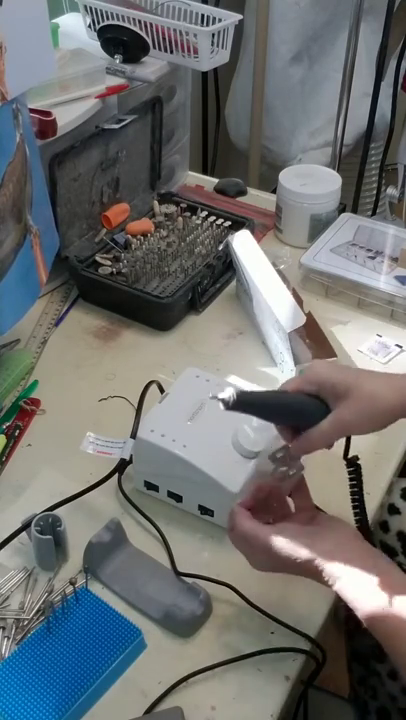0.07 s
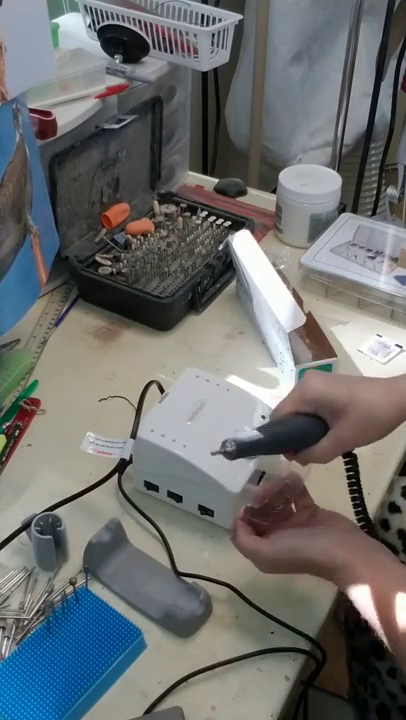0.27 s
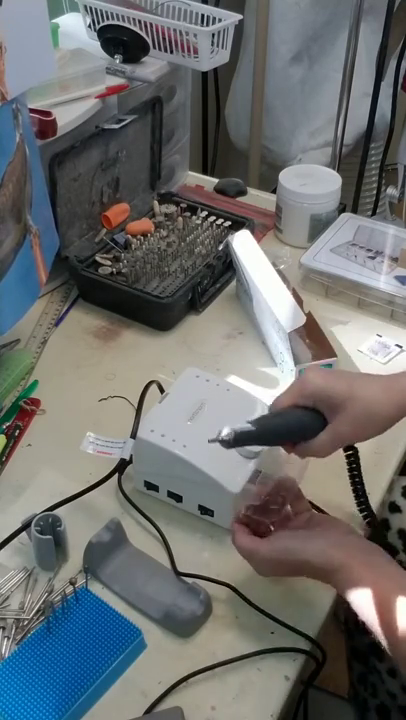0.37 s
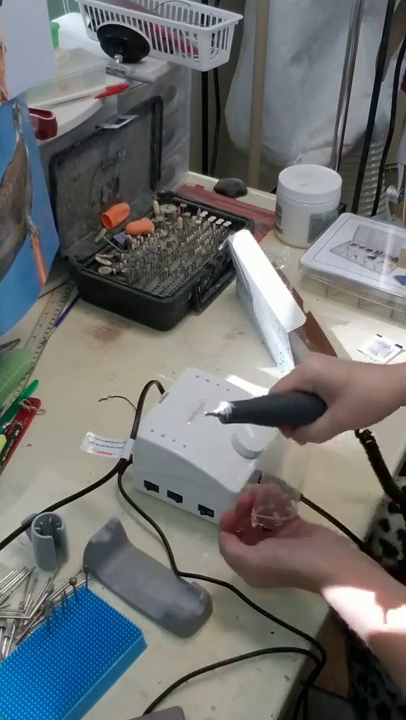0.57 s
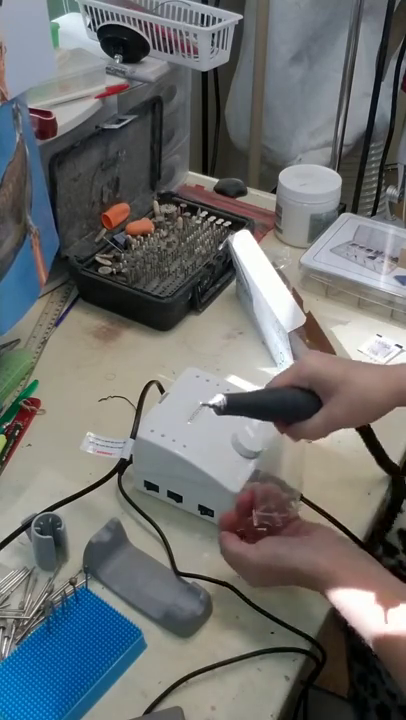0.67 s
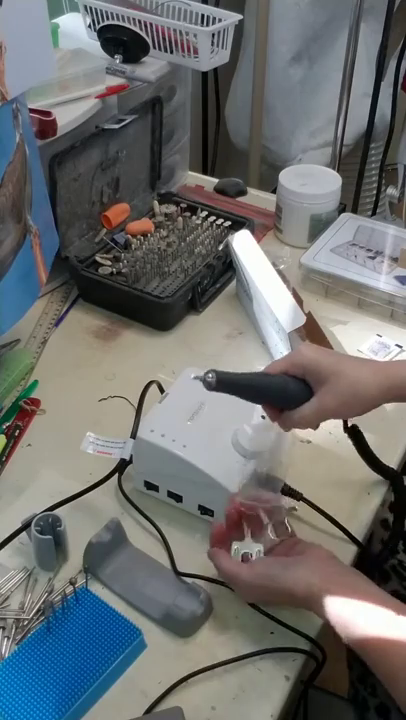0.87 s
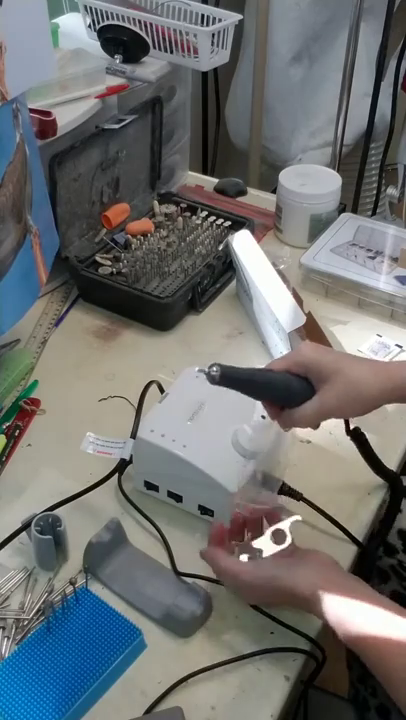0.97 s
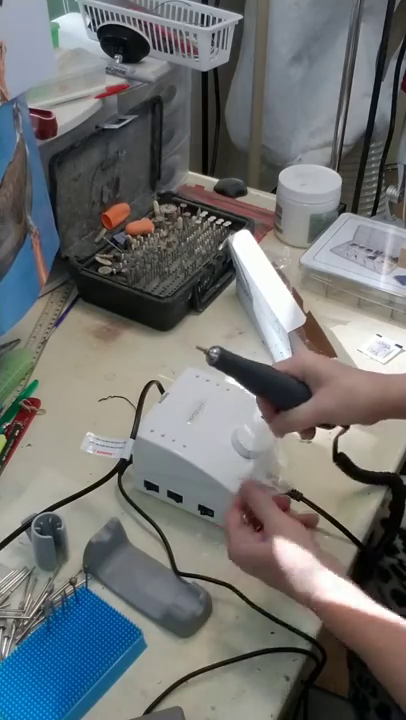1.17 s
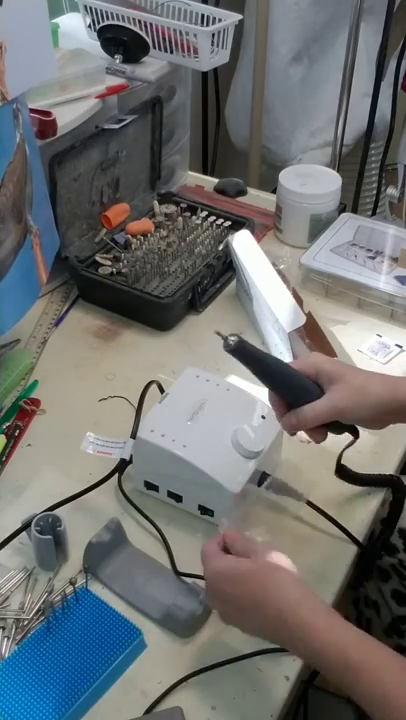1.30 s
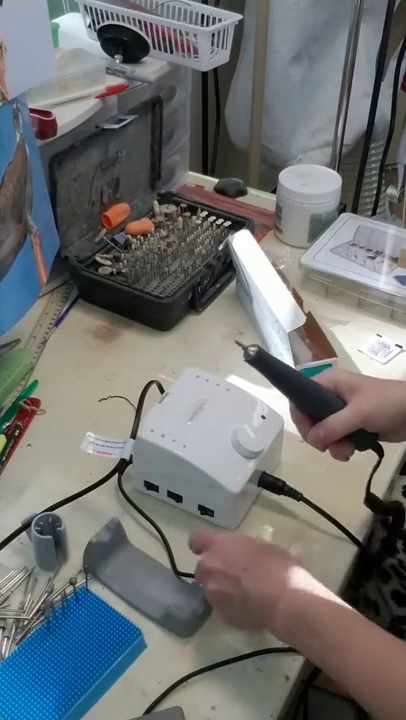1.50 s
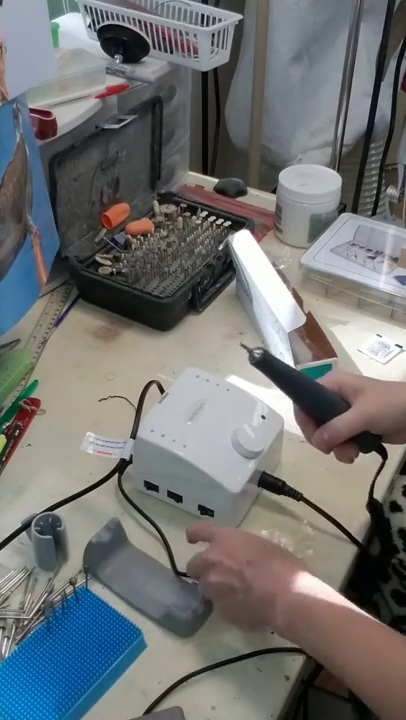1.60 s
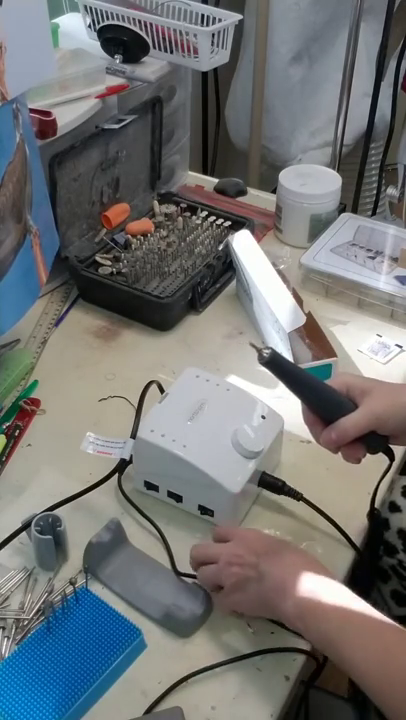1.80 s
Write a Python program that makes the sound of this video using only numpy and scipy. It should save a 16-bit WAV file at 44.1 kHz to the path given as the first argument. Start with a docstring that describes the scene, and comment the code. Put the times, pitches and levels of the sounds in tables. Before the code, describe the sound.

Small metal parts clink and rattle inside a thin, crinkling plastic bag.

```python
"""A steel chuck spanner and small parts clink and rattle in a small, thin plastic bag turned over in one hand.
Each impact excites the modes of the steel, which the fingers and the film soon damp. The film crinkles
and snaps as its creases buckle, and the load bumps against the palm. The bag is crumpled once and put
down on a workbench, and the steel gives a last clink. Bench and small room reflect the sound,
over a faint mains hum."""
import sys
import numpy as np
from scipy import signal
from scipy.fft import rfft, irfft, next_fast_len
from scipy.io import wavfile

SR = 44100
rng = np.random.default_rng(int(sys.argv[2]) if len(sys.argv) > 2 else 0)


def dump(signal):
    """Clip the signal to [-1, 1] and save it as 16-bit WAV at the path in sys.argv[1]."""
    limited = np.clip(np.atleast_2d(signal).T, -1, 1)
    pcm = np.round(limited * 32767).astype(np.int16)
    wavfile.write(sys.argv[1], SR, pcm)


N = 81585
TIME = np.arange(N) / SR

# Harmonics of the mains hum. Each row: frequency in Hz, RMS level in dB.
HUM_HARMONICS = [(119.8, -79.5), (240, -78), (480, -85.5)]
# Spectrum of the room air. Each row: frequency in Hz, relative level in dB.
AIR_SPECTRUM = [(20, -18), (40, 0), (90, 2.5), (140, 0), (200, -7.5), (400, -5), (650, -15.5), (1500, -17),
                (5000, -17), (10000, -20.5), (14000, -16)]

# Envelopes of the film as it is turned over and as it is crumpled. Each row: time in seconds, level in dB.
TURNING_ENVELOPE = [(0, -66.5), (.065, -59), (.11, -61), (.14, -68.5), (.185, -62.5), (.225, -49.5),
                    (.28, -55.5), (.33, -48), (.365, -47), (.385, -54), (.45, -62.5), (.485, -60),
                    (.52, -59.5), (.56, -56.5), (.585, -68.5), (.66, -71.5), (.70, -68.5), (.77, -70),
                    (.805, -62.5), (.825, -64), (.87, -63.5), (.94, -77), (1.0, -108)]
CRUMPLING_ENVELOPE = [(1.15, -104), (1.17, -59.5), (1.2, -50), (1.24, -49.5), (1.265, -50.5), (1.295, -57),
                      (1.35, -74), (1.38, -66), (1.45, -85), (1.515, -85), (1.535, -66), (1.59, -77.5),
                      (1.625, -64), (1.68, -72.5), (1.74, -87)]
# Larger creases snapping. Each row: start in seconds, level in dB, treble relative to body in dB.
CREASE_SNAPS = [(0.0187, -45.5, -19), (0.0376, -51, -2), (0.0575, -56, -9), (0.06, -51, -4),
                (0.0767, -40.5, 12.5), (0.089, -72, 15), (0.094, -46.5, -2), (0.104, -50, 4),
                (.1473, -48.5, 11.5), (.156, -56, -7), (.179, -52, 9), (0.1964, -43, 10),
                (0.1996, -46.5, -3), (0.2063, -53.5, 16), (0.3133, -40, -1), (0.3243, -33, -6),
                (.327, -31.5, -2), (0.341, -51, 29), (0.3984, -41, 18), (0.407, -49, -4), (.471, -49.5, 22),
                (0.527, -54, 9), (.669, -58, 16), (0.8114, -51.5, 10.5), (0.8155, -46.5, 1),
                (0.8233, -45, 5), (0.828, -43.5, 12), (.9124, -58, 3), (1.182, -46, 5), (1.192, -45, 12),
                (1.2116, -36.5, 12.5), (1.2166, -39.5, 5), (1.233, -30, 5), (1.2338, -33, 1),
                (1.2397, -47, 16), (1.2436, -37.5, 11), (1.2465, -32, 12.5), (1.2554, -36, 24),
                (1.2575, -47.5, 23), (1.27, -47, 13), (1.360, -48, 12)]
# Spectra of the crinkling and of a snap's two parts. Each row: frequency in Hz, relative level in dB.
FILM_SPECTRUM = [(150, -29.5), (500, -14), (1000, -9.5), (1300, -14), (1800, -7.5), (2200, -5), (3000, -2),
                 (4500, -1), (6000, -3), (7300, -12.5), (9000, -3), (11500, -7.5), (14000, -4.5)]
SNAP_BODY_SPECTRUM = [(150, -25.5), (500, -22), (1000, -11), (1300, -31.5), (1800, -4.5), (2100, -12.5),
                      (2900, -3), (3800, 3), (4700, 2.5), (6000, -1.5), (7200, -3), (9000, 1.5),
                      (14000, -47)]
SNAP_TREBLE_SPECTRUM = [(1500, -24.5), (4000, 1), (7000, -33), (8500, -3.5), (11000, 11), (13500, 3),
                        (15000, 1)]

# Impacts of steel on steel. Each row: start in seconds, level in dB, five offsets in dB for the modes near
# 3.7, 6, 9, 11.4 and 14 kHz, time of free ringing in seconds, offset of the contact tick in dB.
STEEL_IMPACTS = [(.217, -41.5, -36, -30, -2, 3, -33, 0.0031, -26),
                 (.2245, -43, -11, 1, 8.5, 5.5, -31, 0.018, -20),
                 (.232, -44.5, -5, 9, 8, 15, -16.5, .012, -13),
                 (.246, -51.5, -12, -36, 10, 16, 1, 0.043, -12),
                 (.266, -52.5, -8, -9, 2, 6.5, -8, 0.0081, -22),
                 (.279, -48.5, -5, 1.5, 5, 15.5, -6, 0.035, -13),
                 (.300, -31.5, -10, -6.5, -13, -7, -13, 0.027, -10),
                 (.3113, -37, -7, -7, 1, 10, 0.5, 0.0059, -2),
                 (.3235, -30, -24, -41, -14, -4.5, -11.5, .022, -10),
                 (.3435, -34, -7.5, -42, -19.5, -14.5, -27, 0.011, -15.5),
                 (.3525, -37.5, 6.5, -31, 1.5, -4, -1, 0.0034, -4),
                 (.361, -43, 5, -1.5, -21, 4, 0, 0.0019, 4), (.386, -49, -1, -23, -15, -10, -17, 0.01, -11),
                 (.460, -59.5, -23, -2, -9, -6, 9, 0.0065, 1), (.471, -56, 0, 9, 7, 10, 13, 0.0061, -10),
                 (.485, -65, 7, 10, 7, 22, 21, 0.0047, -7), (.494, -57, -2, 9.5, 10.5, 1, 1, 0.0065, -13),
                 (.542, -57.5, -20, 5, 0, 10, 4, 0.0049, -4),
                 (.551, -65.5, -18, 12, -16, 19.5, -16, 0.067, -11),
                 (.561, -55.5, -12, 3, -27, 0, -18, 0.0059, -25),
                 (.681, -43.5, -10.5, -12, -4.5, 3, -9, .011, -0.5),
                 (.7145, -40.5, -22, -3, -12, 2, -5, 0.0097, -5),
                 (.862, -58.5, -22, 2.5, -22.5, 5, -30, 0.0049, -6),
                 (1.7923, -45, -45, -6.5, -2, -10, -31, 0.0015, -3),
                 (1.800, -54.5, -28, -3.5, -12.5, -5, -26.5, 0.059, 7)]
# Normal modes of the steel. Each row: frequency in Hz, relative level in dB, free T60 in seconds.
STEEL_MODES = [(2950, -15, .08), (3591, -6, .24), (3745, -4.5, .2), (3885, -11, .1), (4880, -13, .1),
               (6100, -6, .09), (6185, -5, .15), (7185, -15, .17), (8430, -16, .06), (8900, -11, .05),
               (9203, -3.5, .22), (9326, -12, .2), (10776, -1, .24), (10824, -4, .24), (11392, -9.5, .3),
               (11460, -13, .2), (11650, -18, .14), (12300, -24, .06), (12850, -22, .07),
               (13895, -1.5, .23)]
# Spectrum of a contact tick. Each row: frequency in Hz, relative level in dB.
CONTACT_SPECTRUM = [(1500, -27), (4000, -17), (5800, 5.5), (7400, -6), (8700, 13.5), (10200, -5.5),
                    (13000, 10), (14500, 1.5)]

# Impacts on the palm and on the bench. Each row: start in seconds, level in dB.
PALM_BUMPS = [(0.327, -71), (0.825, -59), (1.176, -64), (1.232, -63)]
BENCH_TAPS = [(1.5205, -59.5), (1.5971, -44.5), (1.633, -54.5), (1.642, -60)]
# Spectra of those impacts. Each row: frequency in Hz, relative level in dB.
BUMP_SPECTRUM = [(40, -21), (150, -1), (300, -6.5), (450, -4.5), (900, -31), (1500, -19.5), (5000, -53)]
TAP_SPECTRUM = [(700, -24), (1500, -4.5), (1950, -16), (3000, 2), (4100, 0), (5500, 6), (7600, -15),
                (9000, -7.5), (14000, -8)]


def from_db(db):
    """Amplitude ratio of a level in decibels."""
    return 10 ** (np.asarray(db) / 20)


def colour(x, spectrum):
    """Minimum-phase filtering: a causal response with the given spectrum and unit power gain."""
    size = 2 * next_fast_len(N)
    hz, db = np.transpose(spectrum)
    bin_hz = np.arange(size // 2 + 1) * SR / size
    gain = from_db(np.interp(np.log(bin_hz + 1), np.log(hz), db))
    cepstrum = irfft(np.log(gain / np.sqrt(np.mean(gain ** 2))))
    cepstrum[1:size // 2] *= 2  # folding the cepstrum makes the response causal
    cepstrum[size // 2 + 1:] = 0
    return irfft(rfft(x, size) * np.exp(rfft(cepstrum)))[:N]


def bursts(times, db, decay_s):
    """Incoherent addition: exponentially decaying noise bursts sum in power."""
    onsets = np.zeros(N)
    np.add.at(onsets, np.clip((times * SR).astype(int), 0, N - 1), from_db(db) ** 2)
    power = signal.lfilter([1], [1, -np.exp(-2 / (decay_s * SR))], onsets + 1e-22)
    return np.sqrt(power) * rng.choice([-1, 1], N)


def hum_and_air(air_db=-72.5):
    """Superposition: steady mains harmonics lie over the broadband noise of the room air."""
    hum = sum(np.sqrt(2) * from_db(db) * np.sin(2 * np.pi * (hz * TIME + rng.random()))
              for hz, db in HUM_HARMONICS)
    return hum + from_db(air_db) * colour(rng.standard_normal(N), AIR_SPECTRUM)


def film_crinkling(envelope, creases_per_s, spread_db=2, friction_gain=0.6):
    """A Poisson process: tiny creases buckle at random over the friction hiss of film on film."""
    buckles = rng.random(N) < creases_per_s / SR
    sizes_db = spread_db * np.minimum(rng.exponential(1, N), 3)
    crackle = bursts(TIME[buckles], sizes_db[buckles], decay_s=0.00094)
    texture = crackle / crackle.std() + friction_gain * rng.standard_normal(N)
    level = from_db(np.interp(TIME, *np.transpose(envelope)))
    return colour(texture * level, FILM_SPECTRUM)


def crease_snaps(trim_db=-2):
    """Snap-through buckling: a crease flips with a sharp crack and a longer, duller flutter."""
    times, db, treble_db = np.transpose(CREASE_SNAPS)
    flutter = bursts(times, db + trim_db, decay_s=0.0025)
    crack = bursts(times, db + trim_db + treble_db, decay_s=0.00026)
    return colour(flutter, SNAP_BODY_SPECTRUM) + colour(crack, SNAP_TREBLE_SPECTRUM)


def steel_ringing(scatter_db=3, added_damping=3.6, wobble_hz=39, wobble_s=0.0024):
    """Damped modal vibration: the point of contact decides how strongly each mode is excited."""
    hz, mode_db, t60 = np.transpose(STEEL_MODES)
    band = np.searchsorted([4500, 8000, 10000, 11000, 13200], hz)  # band edges in Hz
    t = TIME[:SR // 6]
    ringing = np.zeros(N)
    for start_s, db, low_db, middle_db, high_db, bright_db, top_db, free_s, _ in STEEL_IMPACTS:
        contact_db = np.array([low_db, middle_db, high_db, 0, bright_db, top_db])[band]
        gains = from_db(db + mode_db + contact_db + scatter_db * rng.standard_normal(len(hz)))
        # The touch of fingers and film bends each mode's pitch.
        jitter = rng.standard_normal((len(hz), len(t)))
        wobble = signal.lfilter([1], [1, -np.exp(-1 / (wobble_s * SR))], jitter)
        bent_hz = hz[:, None] + wobble_hz * wobble / wobble.std()
        cycles = np.cumsum(bent_hz, axis=1) / SR + rng.choice([0, .5], (len(hz), 1))
        # After the free ringing, they add a multiple of the mode's own damping.
        decay = np.exp(-np.log(1000) * (t + added_damping * np.maximum(t - free_s, 0)) / t60[:, None])
        clink = gains @ (np.cos(2 * np.pi * cycles) * decay)
        start = int(start_s * SR)
        ringing[start:start + len(t)] += clink[:N - start]
    return ringing


def steel_chatter(contacts=4, spacing_s=0.0027, loss_db=3):
    """Inelastic rebound: each impact is a few unevenly spaced ticks, each weaker than the last."""
    start_s, db, *_, tick_db = np.transpose(STEEL_IMPACTS)[:, :, None]
    bounce = np.arange(contacts)
    times = start_s + spacing_s * (bounce + (bounce > 0) * rng.random((len(start_s), contacts)))
    levels_db = db + tick_db - loss_db * bounce
    return colour(bursts(times.ravel(), levels_db.ravel(), decay_s=0.0019), CONTACT_SPECTRUM)


def palm_bumps():
    """Compliant contact: the load shifts in the soft palm, so its knocks are dull."""
    return colour(bursts(*np.transpose(PALM_BUMPS), decay_s=0.012), BUMP_SPECTRUM)


def bench_taps():
    """Brief contact has a wide spectrum: the bag meets the bench with thin ticks."""
    return colour(bursts(*np.transpose(BENCH_TAPS), decay_s=0.0025), TAP_SPECTRUM)


def reflections(x, t60, gap_s=0.0045):
    """Diffuse reflection: convolution with a delayed, decaying noise tail of unit energy."""
    tail = rng.standard_normal(N) * np.exp(-np.log(1000) * TIME / t60) * (TIME > gap_s)
    return signal.fftconvolve(x, tail / np.linalg.norm(tail))[:N]


def scene():
    """Direct and reflected sound add: the bag and its load, the cluttered bench and the small room."""
    background = hum_and_air()
    turning = film_crinkling(TURNING_ENVELOPE, creases_per_s=600)
    crumpling = film_crinkling(CRUMPLING_ENVELOPE, creases_per_s=850)
    film = turning + crumpling + crease_snaps()
    steel = steel_ringing() + steel_chatter()
    direct = film + steel + palm_bumps() + bench_taps()
    bench = from_db(-11.5) * reflections(direct, t60=0.034)
    room = from_db(-15) * reflections(direct, t60=0.33)
    return (direct + bench + room + background)[None]


def record(dry):
    """Band limiting: a linear-phase low-pass filter cuts the top treble steeply."""
    cutoff_hz = 14100
    return signal.fftconvolve(dry, signal.firwin(301, cutoff_hz, fs=SR)[None], mode="same")


dry = scene()
out = record(dry)
dump(out)
```